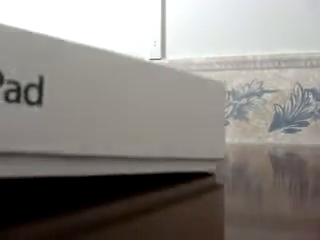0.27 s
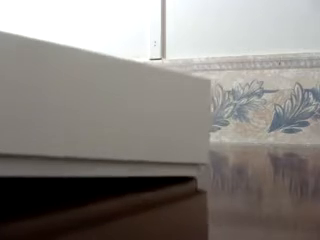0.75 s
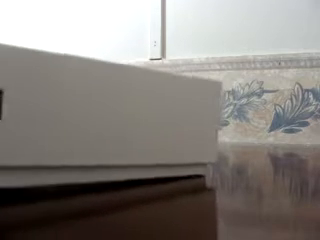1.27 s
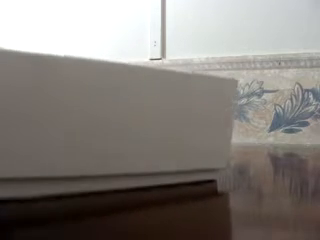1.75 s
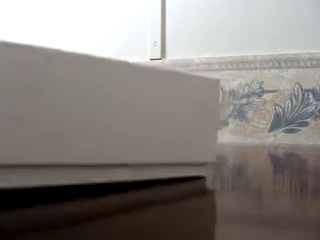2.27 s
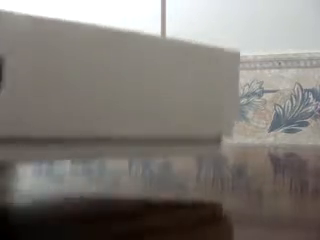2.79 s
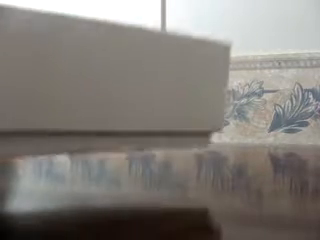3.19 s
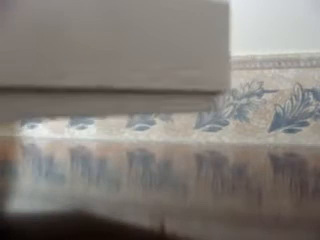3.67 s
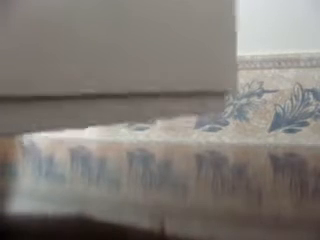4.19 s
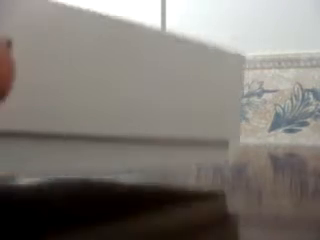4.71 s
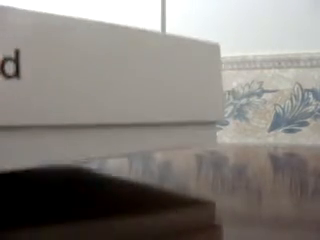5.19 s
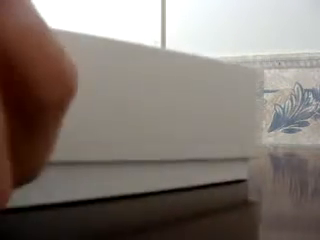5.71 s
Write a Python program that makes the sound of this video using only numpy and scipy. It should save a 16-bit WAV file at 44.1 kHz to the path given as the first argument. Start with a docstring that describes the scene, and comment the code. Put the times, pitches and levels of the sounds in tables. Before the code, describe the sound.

Hands work at a tight cardboard box close to the microphone, with soft scrapes and a few hollow bumps on a counter. Then comes a fast, loud run of knocks as the base slides to and fro in the lid, the hardest slightly overloading the microphone. A card edge snaps, and the box is set down with more bumps and rubbing. The small room adds a short echo and faint steady noise.

```python
"""Tight cardboard box worked open

In a small tiled room the box bumps on a stone counter, is lifted and shaken so that its base knocks
to and fro in the lid, and is set down again. Blows ring damped box modes and crush fibres (noise
bursts); card and fingers rub in between (dense tiny slips). A near wall answers each knock and the
loudest overload the microphone."""
import sys
import numpy as np
from scipy import signal
from scipy.fft import rfft, irfft
from scipy.io import wavfile
from scipy.ndimage import uniform_filter1d

SR = 44100
rng = np.random.default_rng(int(sys.argv[2]) if len(sys.argv) > 2 else 0)


def dump_mix(stems):
    """Bounce the given channels to the path in sys.argv[1] as a 16-bit WAV at rate SR."""
    frames = np.atleast_2d(stems).T  # one column per channel
    limited = np.clip(frames, -1, 1)  # hard clip at full scale
    pcm = np.round(limited * 32767).astype(np.int16)
    wavfile.write(sys.argv[1], SR, pcm)


N = 262326
TIME_S = np.arange(N) / SR
EVENT_S = TIME_S[:SR // 2]
TAP_T60_S = 0.006

# shaking vigour: (time [s], level [dB])
VIGOUR = [(3.42, -46.5), (3.57, -29.5), (3.78, -33), (4.024, -31.5), (4.366, -25.5), (4.6, -31)]
# creak of the stiff side walls: (frequency [Hz], width [Hz], gain [dB])
CREAK_BANDS = [(775, 430, 1.5), (1433, 187, 0)]


def from_db(db):
    """Decibels to gain."""
    return 10 ** (np.asarray(db) / 20)


def unit_rms(x):
    """Scale to unit power."""
    return x / np.sqrt(np.mean(x ** 2) + 1e-20)


def add(track, start_s, sound):
    """Mix a sound into the track."""
    at = int(start_s * SR)
    track[at:at + len(sound)] += sound[:N - at]


def decay(t60_s):
    """Exponential decay, 60 dB down at t60_s."""
    return np.exp(-np.log(1000) * EVENT_S / t60_s)


def at_hz(points, hz):
    """Interpolate each column over log frequency."""
    known_hz, *columns = np.transpose(points)
    return [np.interp(np.log(np.maximum(hz, 1)), np.log(known_hz), column) for column in columns]


def resonate(x, bands):
    """Parallel band-passes, alternating in sign."""
    out = 0
    for k, (hz, width_hz, db) in enumerate(bands):
        r = np.exp(-np.pi * width_hz / SR)
        poles = [1, -2 * r * np.cos(2 * np.pi * hz / SR), r * r]
        out = out + (-1) ** k * from_db(db) * (1 - r * r) / 2 * signal.lfilter([1, 0, -1], poles, x)
    return out


def butter(x, hz, kind, order=2):
    """Causal Butterworth filter."""
    return signal.sosfilt(signal.butter(order, hz, kind, fs=SR, output="sos"), x)


def drift(rate_hz):
    """Low-passed random motion, unit RMS."""
    r = np.exp(-2 * np.pi * rate_hz / SR)
    return unit_rms(signal.lfilter([1], [1, -2 * r, r * r], rng.standard_normal(N + SR))[SR:])


def swell(start_s, length_s, attack_share=0.44, release_share=0.28):
    """Stroke envelope: rounded attack, hold, release."""
    progress = (TIME_S - start_s) / length_s
    ramp = np.minimum(progress / attack_share, (1 - progress) / release_share)
    return np.sin(np.pi / 2 * np.clip(ramp, 0, 1))


def noise_floor(level_db=-44):
    """Steady room and microphone noise."""
    # (frequency [Hz], relative density [dB])
    spectrum = [(18, -78), (30, -17.5), (87, -11.5), (261, -7.5), (288, -4.5), (582, -4.5), (690, -3.5),
                (1150, -6), (1240, -8.5), (1660, -9.5), (2760, -13), (4480, -13.5), (10000, -21.5),
                (13000, -86), (22000, -120)]
    colour = from_db(at_hz(spectrum, np.fft.rfftfreq(N, 1 / SR))[0])
    return from_db(level_db) * unit_rms(irfft(rfft(rng.standard_normal(N)) * colour, N))


def tiled_room(x, late_db):
    """Direct sound, dull wall reflections, low standing waves and a short diffuse tail."""
    # (delay [s], gain [dB])
    reflections = [(.0085, -5.5), (.0156, -16), (.0196, -19)]
    # (frequency [Hz], level [dB], t60 [s])
    standing_waves = [(102, -55.5, 0.53), (144.6, -47, 0.25), (274, -47, 0.028), (354, -79, 0.042),
                      (747, -61, 0.59)]
    # (frequency [Hz], level [dB], t60 [s])
    diffuse_tail = [(99, -1.5, 0.64), (304, -1.5, 0.19), (820, -13, 0.42), (2060, -8.5, 0.26),
                    (8000, -53, 0.061)]
    early = sum(from_db(db) * np.sinc((EVENT_S - delay_s) * SR) for delay_s, db in reflections)
    late = sum(from_db(db) * np.cos(2 * np.pi * hz * EVENT_S) * decay(t60_s)
               for hz, db, t60_s in standing_waves)
    edges_hz = np.geomspace(50, 12000, 9)
    for low_hz, high_hz in zip(edges_hz, edges_hz[1:]):
        db, t60_s = at_hz(diffuse_tail, np.sqrt(low_hz * high_hz))
        envelope = decay(t60_s) * (1 - decay(0.025))
        noise = butter(rng.standard_normal(len(EVENT_S)), [low_hz, high_hz], "band")
        late += from_db(db) * envelope / np.linalg.norm(envelope) * noise
    response = butter(early, 1200, "low") + from_db(late_db) * late
    return x + signal.fftconvolve(x, response)[:N]


def friction(drag, rasp, hiss, centre_hz, slips_per_s, spread_db, judder_db, judder_hz):
    """Tiny slips, bunched by uneven grip, shake panels (drag), edges (rasp) and fibres (hiss)."""
    # each: (frequency [Hz], width [Hz], gain [dB])
    panel_bands = [(150, 160, -39), (291, 150, -13.5), (500, 240, 36), (715, 670, -14.5)]
    edge_bands = [(1047, 217, 4.5), (1396, 330, 3), (2274, 1440, 2), (3260, 3000, 0)]
    fibre_bands = [(4500, 2600, 4.5), (6180, 2570, 7.5), (9380, 2000, -3.5)]
    sizes = from_db(spread_db * np.minimum(rng.exponential(1, N), 4)) * rng.choice([-1, 1], N)
    slips = sizes * (rng.random(N) < slips_per_s / SR)
    slips *= from_db(judder_db * np.tanh(drift(judder_hz)))
    panels = unit_rms(butter(resonate(slips, panel_bands), 700, "low"))
    fibres = unit_rms(butter(resonate(slips, fibre_bands), 2740, "high", order=3))
    # the place of contact favours edge bands near centre_hz
    edges = sum((-1) ** k * resonate(slips, [band]) * np.exp(-np.log2(band[0] / centre_hz) ** 2)
                for k, band in enumerate(edge_bands))
    edges = unit_rms(butter(edges, [700, 4800], "band"))
    return drag * panels + rasp * edges + hiss * fibres


def rubbing(drag_db=-3, rasp_db=-0.5, rasp_hz=1730, octaves_per_db=0.03):
    """Card and fingers rub in strokes; the rasp sits higher in light ones than in heavy ones."""
    # (start [s], length [s], level [dB], hiss re level [dB], drag re level [dB])
    strokes = [(0.192, 0.024, -31, -11, -3.5), (0.277, 0.11, -40, -11.5, 0.5), (0.579, .17, -42, -4, -5.5),
               (0.721, 0.048, -40.5, -4.5, -0.5), (0.824, 0.093, -38.5, -6, -1.5),
               (0.912, .08, -45, -3.5, -18), (1.005, 0.15, -36, -7, -11), (1.179, 0.074, -33, -8, -13.5),
               (1.241, 0.063, -44, -5.5, 0.5), (1.373, 0.066, -54, -13, 13),
               (1.753, 0.11, -41.5, -2.5, -18), (2.08, .11, -56, -13, 14.5), (2.177, 0.15, -48, -5, -8),
               (2.426, 0.088, -39, -5.5, -1.5), (2.507, 0.064, -30.5, -0.5, -13.5),
               (2.558, 0.061, -34, -4, -12.5), (2.654, 0.083, -45, -6.5, -2.5), (2.799, 0.1, -36.5, -6, 0),
               (2.93, 0.12, -43, -4.5, -2.5), (3.041, .12, -38, -2.5, 3.5), (3.288, .14, -42, -2.5, 4),
               (4.613, 0.089, -33, -10.5, -2), (4.738, 0.065, -45.5, -7.5, 12.5),
               (4.855, 0.13, -42.5, -7, 2), (4.946, 0.13, -39.5, 5.5, 0), (5.1, 0.37, -42, -5.5, 5.5),
               (5.408, 0.066, -40.5, -6, -1), (5.467, .14, -33.5, -5.5, 5), (5.593, 0.057, -34, -4.5, 0),
               (5.627, 0.039, -32, 7, 0), (5.655, 0.068, -29.5, 2.5, -4.5), (5.806, 0.066, -32, 0, 1),
               (5.897, 0.091, -41, -6.5, 5)]
    drag, rasp, hiss = np.zeros((3, N))
    for start_s, length_s, db, light_db, heavy_db in strokes:
        force = from_db(db) * swell(start_s, length_s)
        drag += from_db(drag_db + heavy_db) * force
        rasp += from_db(rasp_db) * force
        hiss += from_db(light_db) * force
    start_s, length_s, _, light_db, heavy_db = np.transpose(strokes)
    tilt_db = np.interp(TIME_S, start_s + length_s / 2, light_db - heavy_db)
    centre_hz = rasp_hz * 2 ** (octaves_per_db * tilt_db)
    return friction(drag, rasp, hiss, centre_hz,
                    slips_per_s=14000, spread_db=3, judder_db=3.2, judder_hz=89.5)


def base_sliding(drag_db=-8, rasp_db=-12.5, hiss_db=-27):
    """The base slides in the lid, louder the harder it is shaken."""
    times_s, db = np.transpose(VIGOUR)
    active = (TIME_S > times_s[0]) * (TIME_S < times_s[-1])
    force = uniform_filter1d(from_db(np.interp(TIME_S, times_s, db)) * active, size=SR // 200)
    drag, rasp, hiss = np.outer(from_db([drag_db, rasp_db, hiss_db]), force)
    return friction(drag, rasp, hiss, centre_hz=1430,
                    slips_per_s=6700, spread_db=1.5, judder_db=6, judder_hz=50)


def lid_groan(start_s=3.525, length_s=0.073, from_hz=143, to_hz=199, level_db=-33):
    """Faint stick-slip tone of the lid's broad face, rising as the card tightens."""
    hz = np.interp(TIME_S, [start_s, start_s + length_s], [from_hz, to_hz])
    return from_db(level_db) * swell(start_s, length_s) * np.sin(2 * np.pi * np.cumsum(hz) / SR)


def base_chatter(level_db=-15, touches_per_s=130, spread_db=4, vigour_exponent=2.2):
    """The loose base brushes the lid in quick, uneven touches that grow with vigour."""
    # loose card: (frequency [Hz], width [Hz], gain [dB])
    card_bands = [(600, 54, -4), (840, 88, 10.5), (1390, 270, -12)]
    times_s, db = np.transpose(VIGOUR)
    active = (TIME_S > times_s[0]) * (TIME_S < times_s[-1])
    force = from_db(db.max() + vigour_exponent * (np.interp(TIME_S, times_s, db) - db.max())) * active
    hits = rng.random(N) < touches_per_s / SR
    sizes = from_db(spread_db * np.tanh(rng.standard_normal(N))) * rng.choice([-1, 1], N)
    return from_db(level_db) * force * unit_rms(resonate(hits * sizes + 1e-18, card_bands))


def fibre_burst(envelope, bands, touch_s=0.018):
    """Crushing fibres: shaped resonant noise with the energy of touch_s at unit power."""
    sound = resonate(rng.standard_normal(len(EVENT_S)) * envelope, bands)
    sound = butter(sound, bands[0][0] / 2, "high")
    return sound / np.linalg.norm(sound) * np.sqrt(touch_s * SR)


def edge_snaps(width_hz=800):
    """A card edge catches and snaps free: short ring, thin crack."""
    # (time [s], level [dB], pitch [Hz], t60 [s], crack re level [dB])
    snaps = [(0.374, -39.5, 1500, 0.02, -12), (2.441, -45, 1190, .01, 3.5), (2.538, -29, 2640, 0.011, -20),
             (2.842, -36.5, 1260, 0.014, -19), (4.627, -22.5, 1405, 0.066, -35),
             (5.1009, -30, 1130, 0.021, 2.5), (5.546, -25.5, 2100, 0.0056, -20)]
    out = np.zeros(N)
    for time_s, db, hz, t60_s, crack_db in snaps:
        edge = fibre_burst(decay(t60_s), [(hz, width_hz, 0)])
        crack = fibre_burst(decay(t60_s / 2), [(3500, 2000, 0), (7000, 3000, -4)])
        add(out, time_s, from_db(db) * (edge + from_db(crack_db) * crack))
    return out


def struck_box(modes, tuning, thud_db, slap_db, thud_hz, middle_hz, slap_hz):
    """Damped modes: flat, heavy contact favours the low (thud), a hard edge the high (slap)."""
    contact = [(thud_hz, thud_db), (middle_hz, 0), (slap_hz, slap_db)]
    out = 0
    for k, (hz, db, t60_s) in enumerate(modes):
        ring = np.sin(2 * np.pi * hz * tuning * EVENT_S) * decay(t60_s)
        out = out + (-1) ** k * from_db(db + at_hz(contact, hz)[0]) * ring
    return out


def counter_bumps(body_db=12, clack_db=-4, settle_db=-16, ref_thud_db=2, ref_slap_db=-7):
    """The box lands: sharp tap, hollow thud, clack of the walls, brief settling chatter."""
    # (time [s], level [dB], relative thud [dB], relative slap [dB], relative crack [dB])
    bumps = [(0.1982, -19, -5.5, -13, -13), (0.208, -28.5, 5, -2, -7), (0.2379, -14.5, -10, -13.5, -15.5),
             (0.484, -17.5, -3.5, -6, -7), (1.7404, -13.5, -9, -3, -19), (2.354, -32, -15.5, -28, -13),
             (2.878, -29, -15, -20, -18), (5.0505, -11, -6.5, -11.5, -18), (5.4572, -26, -14, -7.5, -23),
             (5.5739, -4.5, -26, -13, -16.5)]
    # box on the counter: (frequency before tuning [Hz], level [dB], t60 [s])
    standing_modes = [(90.6, -20, 0.14), (127, -19.5, 0.09), (265.3, -2, 0.077), (361.5, -2.5, 0.041),
                      (526, -3, 0.021), (704, -6.5, 0.018), (780, -2, 0.0061), (1137, -13, 0.046),
                      (1475, -14, 0.011), (1755, -24.5, 0.0056)]
    # card surface: (frequency [Hz], width [Hz], gain [dB])
    crack_bands = [(2010, 630, 8.5), (5000, 5500, -4), (7700, 7900, -8)]
    out = np.zeros(N)
    tap_envelope = decay(TAP_T60_S) + from_db(settle_db) * decay(0.037)
    for time_s, db, thud_db, slap_db, crack_db in bumps:
        body = struck_box(standing_modes, tuning=0.97, thud_db=thud_db - ref_thud_db,
                          slap_db=slap_db - ref_slap_db, thud_hz=232, middle_hz=462, slap_hz=960)
        tap = from_db(crack_db) * fibre_burst(tap_envelope, crack_bands)
        clack = from_db(clack_db + slap_db) * fibre_burst(decay(0.067), CREAK_BANDS)
        add(out, time_s, from_db(db) * (from_db(body_db) * body + tap + clack))
    return out


def base_knocks(body_db=11, crack_db=-4, crunch_db=-0.5, creak_db=-1, rebound_db=-4):
    """At each turn the base cracks against its stop, crunches on, catches again and rattles back."""
    # (time [s], level [dB], relative thud [dB], relative slap [dB], nominal pitch [Hz])
    knocks = [(2.518, -31, -25, -11, 523), (2.783, -31, -24, -15, 608), (2.841, -35.5, -13, 11.5, 517),
              (3.408, -32.5, -5, 3.5, 493), (3.435, -10, -15, -9.5, 467), (3.512, -29, -30, -14, 596),
              (3.605, -25, -6.5, -1.5, 506), (3.7078, -14.5, -10.5, -6, 447), (3.8057, -20, -10, -9.5, 634),
              (3.8326, -10, -10, -9.5, 463), (3.9147, -17.5, -11, -6, 540), (3.9581, -7.5, -14, -11, 466),
              (4.04, -17, -15, -5, 587), (4.0668, -10, -11, -10.5, 464), (4.1395, -17.5, -14, -4, 466),
              (4.1825, -6.5, -13, -9.5, 450), (4.253, -25, -4, 4.5, 440), (4.2939, -9.5, -9.5, -4.5, 454),
              (4.3583, -16, -10, -3.5, 446), (4.405, -9.5, -25, -42, 462), (4.4151, -12, -12.5, -2.5, 453),
              (4.4746, -17.5, -9, -5.5, 449), (4.5245, -15.5, -17, -8, 448)]
    # box in the air: (frequency before tuning [Hz], level [dB], t60 [s])
    held_modes = [(246.5, -11.5, 0.048), (379.7, -0.5, 0.023), (473, 1.5, 0.026), (693, -2, 0.014),
                  (935, -6, 0.0095), (1160, -22, 0.011), (1354, -19.5, 0.037)]
    # crunching walls: (frequency [Hz], width [Hz], gain [dB])
    crunch_bands = [(2010, 700, 3), (3270, 2800, -6.5), (5380, 600, -4)]
    ref_thud_db, ref_slap_db, ref_hz = -11, -4.5, 465
    knock_sharp_db, rattle_sharp_db, sharp_per_vigour = -9, 8, 0.45
    lag_s, loss_db, rattle_thud_db, rattle_slap_db, rattle_hz = 0.04, 28.5, -15, 11, 487
    skid_s = 0.0035
    skid = np.sqrt(EVENT_S / skid_s) * np.exp(-(EVENT_S / skid_s / 2) ** 2 / 2)
    touches = [(*knock, knock_sharp_db) for knock in knocks]
    touches += [(time_s + lag_s, db - loss_db, rattle_thud_db, rattle_slap_db, rattle_hz, rattle_sharp_db)
                for time_s, db, *_ in knocks]
    rebounds_s = rng.uniform(0.007, 0.011, len(touches))
    out = np.zeros(N)
    for (time_s, db, thud_db, slap_db, hz, sharp_db), rebound_s in zip(touches, rebounds_s):
        sharp_db += sharp_per_vigour * np.interp(time_s, *np.transpose(VIGOUR))
        tuning = (hz / ref_hz) ** 1.09  # a firmer grip raises all modes
        body = struck_box(held_modes, tuning, thud_db - ref_thud_db, slap_db - ref_slap_db,
                          thud_hz=253, middle_hz=453, slap_hz=940)
        crack = from_db(crack_db + sharp_db) * fibre_burst(decay(TAP_T60_S), crunch_bands)
        crunch = from_db(crunch_db + sharp_db) * fibre_burst(skid, crunch_bands)
        creak = from_db(creak_db + (slap_db + sharp_db) / 2) * fibre_burst(skid, CREAK_BANDS)
        rebound = from_db(rebound_db + sharp_db) * fibre_burst(decay(2 * TAP_T60_S), crunch_bands)
        add(out, time_s, from_db(db) * (from_db(body_db) * body + crack + crunch + creak))
        add(out, time_s + rebound_s, from_db(db) * rebound)
    return out


def scene():
    """Mono mix; the box held in the air is nearer the microphone, so its sounds carry less of the room than
    those on the counter."""
    on_counter = tiled_room(counter_bumps() + edge_snaps() + rubbing(), late_db=-1)
    in_air = tiled_room(base_knocks() + base_sliding() + base_chatter() + lid_groan(), late_db=-8.5)
    return (on_counter + in_air + noise_floor())[None]


def record(dry):
    """The top treble is cut near 10 kHz; the loudest knocks clip and splash above it."""
    treble_top_hz, clip_level, cutoff_hz = 10100, 0.71, 16300
    treble_filter = signal.ellip(10, 0.3, 70, treble_top_hz, fs=SR, output="sos")
    clipped = np.clip(signal.sosfilt(treble_filter, dry), -clip_level, clip_level)
    return butter(clipped, cutoff_hz, "low", order=16)


dry = scene()
out = record(dry)
dump_mix(out)
```